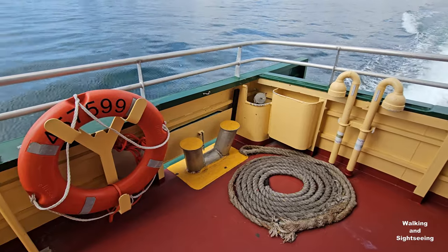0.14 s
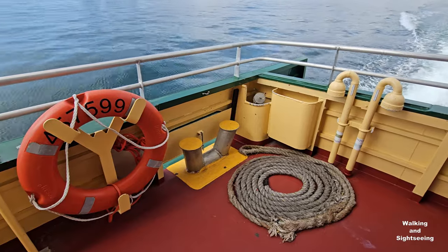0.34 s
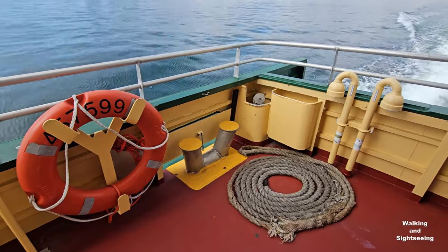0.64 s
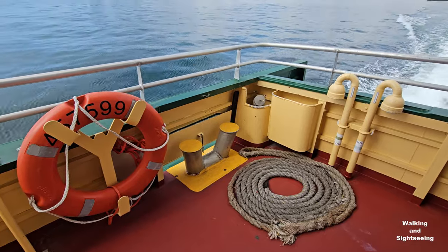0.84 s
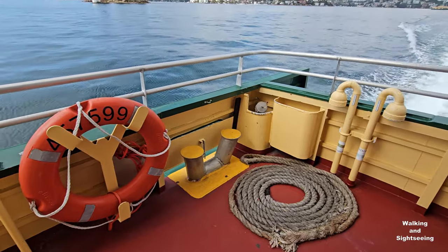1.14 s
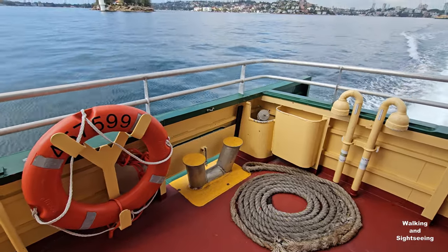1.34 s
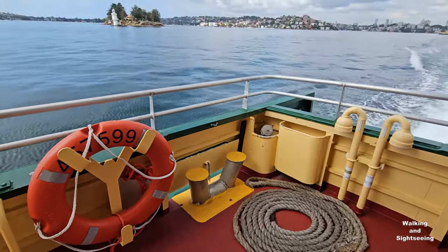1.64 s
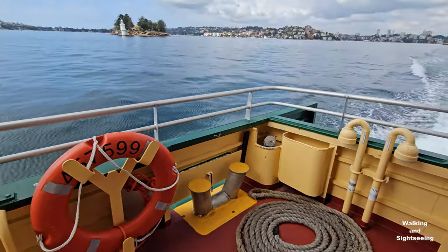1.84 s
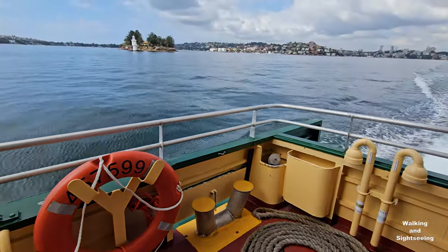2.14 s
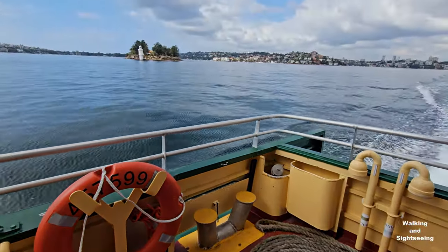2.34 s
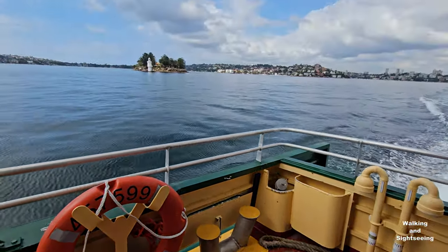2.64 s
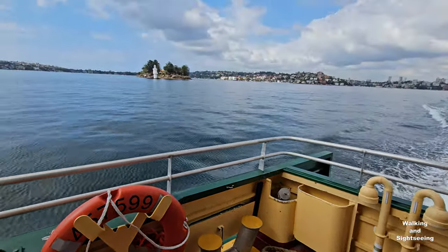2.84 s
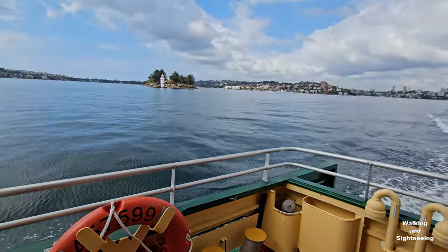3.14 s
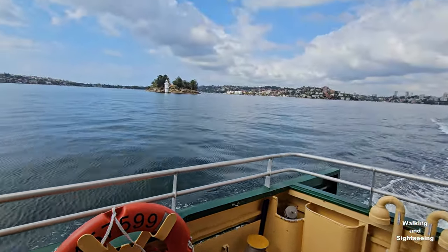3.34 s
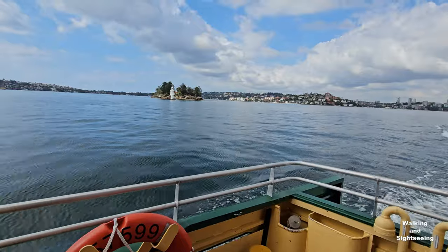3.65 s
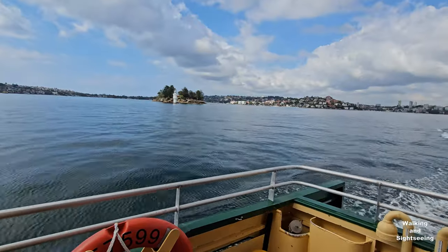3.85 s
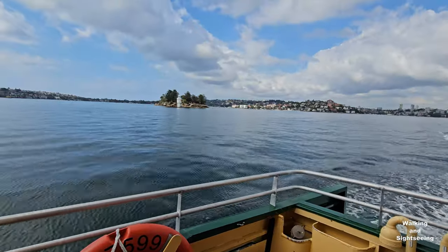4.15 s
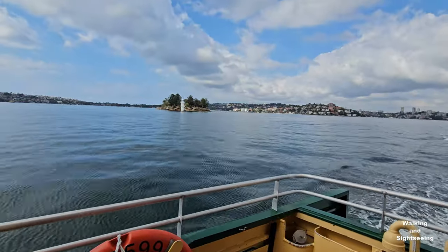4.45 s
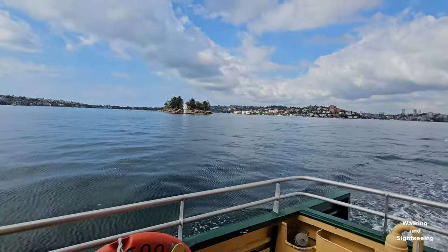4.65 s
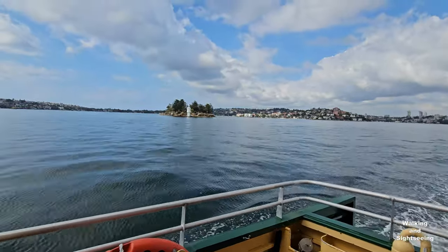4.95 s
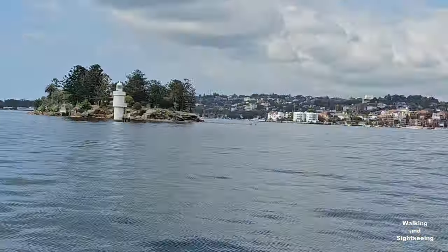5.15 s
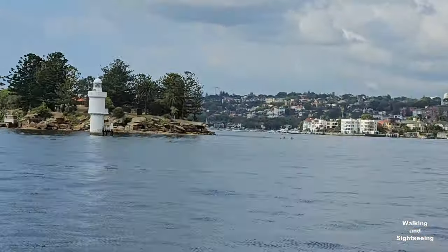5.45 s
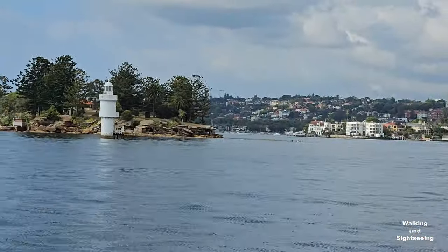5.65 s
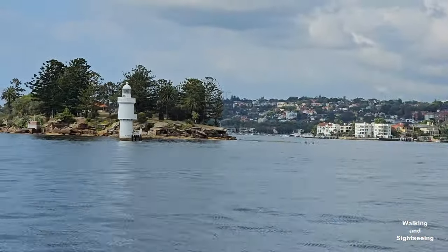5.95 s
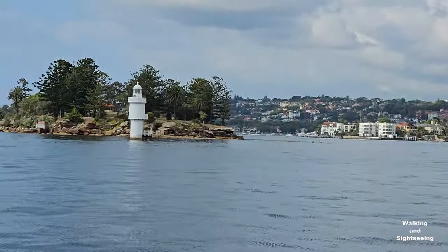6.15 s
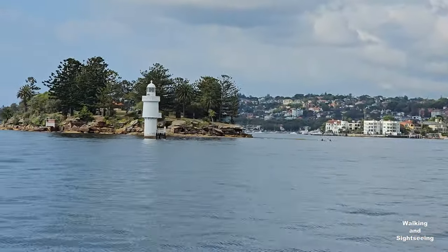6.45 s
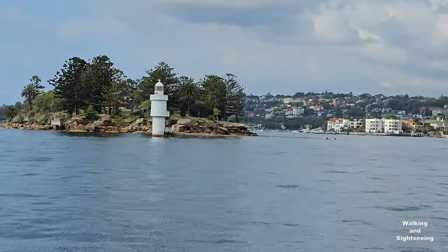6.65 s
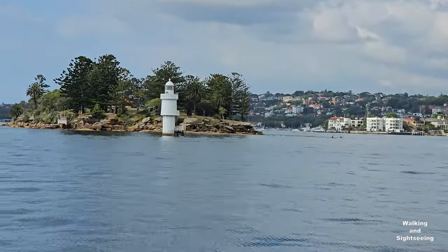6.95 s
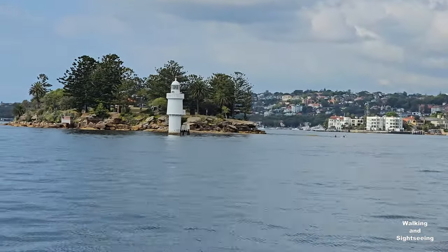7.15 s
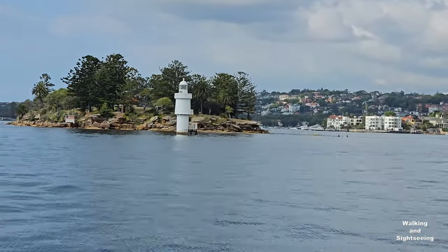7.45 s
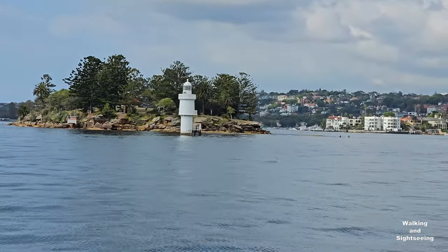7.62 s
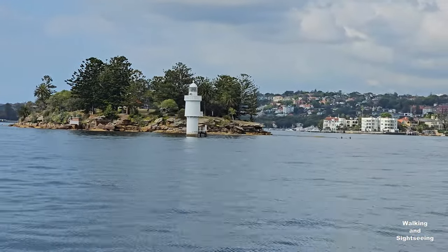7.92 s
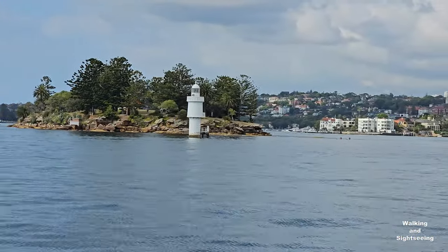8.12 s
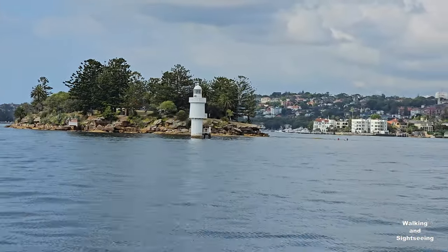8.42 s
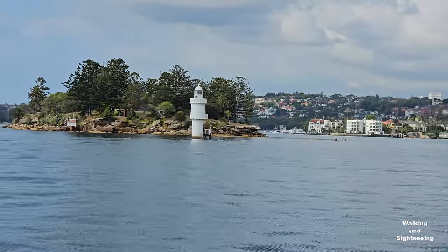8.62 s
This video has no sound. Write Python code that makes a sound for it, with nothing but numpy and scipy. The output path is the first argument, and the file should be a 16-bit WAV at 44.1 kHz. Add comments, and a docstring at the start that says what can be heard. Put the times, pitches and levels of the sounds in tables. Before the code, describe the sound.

A steady heavy engine rumble fills the whole stretch, slightly beating and pulsing, with a mid-pitched exhaust roar and the soft wash of the wake. A thin whistle wavers very high and quick ticks come faintly from the right. Outdoors on deck, gusts knock the left microphone port. Past the midpoint the sound turns darker and bassier, then slowly fills out.

```python
"""A ferry's stern deck under way: two engines, the main diesel and a generator set, drone as steady tones
over a hull rumble of noise. Filtered noise makes the exhaust roar and the wake's hiss, a wavering sine the
turbocharger whistle, and sharp taps ring a cover as valve ticks. Wind buffets both microphone ports
and pops on the left one. Part-way the pickup narrows, which lifts the rumble and dips the hiss."""
import sys
import numpy as np
from scipy import signal
from scipy.fft import rfft, irfft, next_fast_len
from scipy.io import wavfile
from scipy.ndimage import uniform_filter1d, map_coordinates

SR = 44100
rng = np.random.default_rng(int(sys.argv[2]) if len(sys.argv) > 2 else 0)


def wrap_up_sound(samples):
    """Save the sound to the file named by the first command line argument, as 16-bit audio."""
    columns = np.atleast_2d(samples).T
    # keep every value between -1 and 1, then stretch to whole-number steps
    tamed = np.clip(columns, -1, 1)
    steps = np.round(tamed * 32767).astype(np.int16)
    wavfile.write(sys.argv[1], SR, steps)


N = 387198
TIME_S = np.arange(N) / SR


def amp(db):
    """Turn decibels into a gain."""
    return 10 ** (np.asarray(db) / 20)


def unit(x):
    """Scale x to an rms of 1."""
    return x / np.sqrt(np.mean(x ** 2) + 1e-20)


def along(points, hz):
    """Read a curve of (Hz, value) points at any frequency, on a log axis."""
    f, value = np.transpose(points)
    return np.interp(np.log(hz + 1), np.log(f + 1), value)


def over_time(points):
    """Join (s, value) points by straight lines, one value per sample."""
    s, value = np.transpose(points)
    return np.interp(TIME_S, s, value)


def wobble(rate_hz):
    """A smooth random curve with rate_hz random points a second."""
    points = rng.standard_normal(int(N * rate_hz / SR) + 4)
    return map_coordinates(points, [np.arange(N) * rate_hz / SR])


def bump(at_s, half_length_s):
    """A smooth rise and fall of height 1."""
    return np.exp(-((TIME_S - at_s) / half_length_s) ** 2)


def filtered(x, response):
    """Shape x by a response that depends on frequency."""
    m = next_fast_len(N + SR // 2)  # room for the ringing
    hz = np.fft.rfftfreq(m, 1 / SR)
    return irfft(rfft(x, m) * response(hz), m)[..., :N]


def resonances(modes):
    """Response of several ringing modes (Hz, width Hz, dB), with alternating signs."""
    def response(hz):
        total = 0
        for k, (centre, width, db) in enumerate(modes):
            damping = 1j * hz * width
            total = total + (-1) ** k * amp(db) * damping / (centre ** 2 - hz ** 2 + damping)
        return total
    return response


def cycles(rate):
    """Engine cycles done at each sample: the running sum of the rate."""
    return np.cumsum(over_time(rate)) / SR


SWITCH_S, SWITCH_TAKES_S, SETTLE_S = 4.855, 0.32, 0.98


def narrowed():
    """Share of the narrow pickup, sliding from 0 to 1."""
    return np.clip((TIME_S - SWITCH_S) / SWITCH_TAKES_S, 0, 1)


def level_db(wide_db, step_db, regained_db):
    """A steady level, a step as the pickup narrows, then a slow climb."""
    since = np.clip(TIME_S - SWITCH_S - SWITCH_TAKES_S, 0, None)
    return wide_db + step_db * narrowed() + regained_db * (1 - np.exp(-since / SETTLE_S))


# how alike noise is at the two ports, 1 = the same: [f/Hz, likeness]
LIKENESS = [(60, .96), (110, .975), (200, .93), (370, .78), (680, .4), (1240, -.2), (2280, -.04), (4180, 0)]


def rush(spectrum, patchy_db):
    """Coloured stereo noise of rms 1, with random patches in time and pitch; its bass is alike at both ports."""
    z = signal.stft(rng.standard_normal((2, N)), nperseg=512)[2]
    patches = uniform_filter1d(rng.standard_normal(z.shape[1:]), size=8, axis=0)
    patches = uniform_filter1d(patches, size=10, axis=1)
    pair = signal.istft(z * amp(patchy_db * unit(patches)), nperseg=512)[1][:, :N]

    def mid_side(hz):
        angle = np.arccos(np.clip(along(LIKENESS, hz), -1, 1)) / 2
        return amp(along(spectrum, hz)) * [np.cos(angle), np.sin(angle)]

    mid, side = filtered(pair, mid_side)
    return unit(np.array([mid + side, mid - side]))


# colour of the wake's hiss before its overall level: [f/Hz, level/dB]
WAKE_COLOUR = [(880, 0), (1500, -3), (2190, -1), (2730, -6), (4900, -6.5), (5450, -5.5), (6900, -8),
               (7500, -4.5), (8500, -6.5), (9300, -0.5), (9850, -3.5), (10500, -15), (11500, -8.5),
               (12300, -12.5), (14600, -13)]


def wake(generator_turns):
    """Churning water as noise that throbs once per generator cycle and splashes irregularly."""
    throb_db = 0.8 * np.cos(2 * np.pi * (generator_turns - .5))
    splash_db = .5 * wobble(9.4) + 0.1 * wobble(4.23)
    level = level_db(wide_db=-37.5, step_db=-5, regained_db=5.8)
    return amp(level + throb_db + splash_db) * rush(WAKE_COLOUR, patchy_db=0.83)


# colour of the exhaust roar before its overall level: [f/Hz, level/dB]
ROAR_COLOUR = [(200, -45), (330, -4), (420, -0.5), (560, -5), (650, -10.5), (850, -9.5), (1000, -17.5),
               (1300, -15), (1700, -25.5), (3000, -42.5)]


def exhaust_roar():
    """Exhaust noise, strongest in the middle pitches, with a slightly unsteady level."""
    level = level_db(wide_db=-36, step_db=1.1, regained_db=4.2)
    return amp(level + .6 * wobble(9)) * rush(ROAR_COLOUR, patchy_db=1)


# colour that the narrow pickup gives the roar and hiss: [f/Hz, level/dB]
NARROW_COLOUR = [(300, -3.5), (430, 3), (560, 0), (700, -2), (1100, -2.5), (1500, 0), (2500, 0),
                 (5000, -0.5), (8000, -1.5), (9500, -2.5), (11000, -5), (14000, -9)]


def through_pickup(wide):
    """Fade from the wide sound to the narrow pickup's duller colour."""
    share = narrowed()
    narrow = filtered(wide, lambda hz: amp(along(NARROW_COLOUR, hz)))
    return (1 - share) * wide + share * narrow


def pop(db, t60_s, edge_hz):
    """An eddy bursts on the port: a sudden low push and a brief edge tone at its rim, duller in the treble."""
    t = np.arange(SR // 5) / SR
    hz = np.fft.rfftfreq(len(t), 1 / SR)
    snap = np.exp(-((t - .002) / .0002) ** 2)
    fade = amp(-60 * t / t60_s) * (1 - np.exp(-t / .001))
    burst = snap + fade * rng.standard_normal(len(t))
    ring = resonances([(150, 300, -2), (edge_hz, 250, 0), (1500, 1500, -24)])
    z = rfft(burst) * ring(hz) / (1 + 1j * hz / 3000) ** 2
    onset = irfft(z * (hz > 400), len(t))[:SR // 60]  # the level is set on this part
    return amp(db) * irfft(z, len(t)) / np.sqrt(np.mean(onset ** 2))


# colour of the low wind buffeting before its overall level: [f/Hz, level/dB]
BUFFET_COLOUR = [(25, -16), (50, 5.5), (250, -4.5), (500, -12), (800, -17), (1200, -38.5), (2500, -37),
                 (5000, -76)]
# wind gusts, before each port's own gain: [t/s, half length/s, level/dB]
WIND_GUSTS = [(0, .5, -27), (2.75, .2, -28.5), (3.7, .25, -31), (5.096, .3, -31), (6.003, .5, -28),
              (7.303, .6, -28), (8.752, .25, -27)]
# loudest pops on the left port; level is that of the onset above 400 Hz,
# t60 the time its noise tail takes to fall 60 dB: [t/s, level/dB, t60/s, edge tone f/Hz]
LOUD_POPS = [(2.714, -18, .025, 450), (2.762, -24, .04, 550), (2.781, -28, .03, 800),
             (3.667, -23, .08, 550), (3.69, -25, .06, 500), (3.715, -27, .06, 500), (5.19, -26, .06, 500),
             (5.225, -26, .06, 650), (6.214, -19, .05, 720), (6.231, -22, .035, 720),
             (6.243, -25, .03, 700), (7.422, -23, .06, 500), (7.455, -23, .05, 450), (7.645, -24, .05, 450),
             (7.739, -22, .07, 650), (7.789, -24, .06, 500), (8.639, -24, .1, 400), (8.718, -23, .06, 500)]


def wind():
    """Turbulence on the ports: unrelated low buffeting on both, and short pops on the windward left."""
    calm_db = -40  # buffeting between gusts
    strength = amp(calm_db) + sum(amp(db) * bump(s, half_s) for s, half_s, db in WIND_GUSTS)
    noise = filtered(rng.standard_normal((2, N)), lambda hz: amp(along(BUFFET_COLOUR, hz)))
    lumps = amp(5.8 * np.array([wobble(14), wobble(14)]))
    port_gain = amp([[1.5], [-3]])  # left, right
    buffeting = strength * port_gain * unit(lumps * noise)
    out = np.pad(buffeting, ((0, 0), (0, SR)))

    # ten small pops, likelier where the wind is stronger
    when, size, pitch = rng.random((10, 3)).T
    starts = np.interp(when, np.cumsum(strength) / strength.sum(), TIME_S)
    small_db, small_t60_s, small_hz = -30, .07, 450
    small_pops = [(s, small_db + 5 * (a - .5), small_t60_s, small_hz * (.8 + .4 * p))
                  for s, a, p in zip(starts, size, pitch)]
    for s, *shape in LOUD_POPS + small_pops:
        out[0, round(s * SR):][:SR // 5] += pop(*shape)
    return out[:, :N]


# pitch of the turbocharger whistle before its flutter: [t/s, f/Hz]
WHISTLE_PITCH = [(0, 9500), (1.9, 9488), (3.1, 9460), (4.65, 9510), (6.2, 9462), (7.8, 9527), (8.78, 9490)]


def turbocharger():
    """A thin unsteady whistle; the main engine's firing puts a weaker side tone below it."""
    hz = over_time(WHISTLE_PITCH) + 8 * wobble(30)
    port_drift = 1.2 * np.array([wobble(14), wobble(14)])
    phase = 2 * np.pi * np.cumsum(hz) / SR + port_drift
    side_tone = amp(-7) * np.sin(phase - 2 * np.pi * cycles(MAIN_SPEED) * 3)  # three firings a cycle lower
    flicker = amp(2.1 * np.array([wobble(11), wobble(12)]))
    level = level_db(wide_db=-48.5, step_db=-4, regained_db=1)
    return amp(level) * unit(flicker * (np.sin(phase) + side_tone))


# four valve closings: [share of the generator cycle, level/dB]
VALVE_TAPS = [(.11, -9), (.305, 0), (.51, -1), (.925, -8)]
# ringing of the valve cover: [f/Hz, width/Hz, level/dB]
COVER_MODES = [(5450, 300, -14), (7450, 250, -11), (7890, 60, 0), (7980, 60, -3), (8050, 80, -2)]


def valve_gear(turns):
    """Four closings per cycle, uneven in strength, each a sharp tap ringing the cover; louder on the right."""
    draw = rng.standard_normal((int(turns[-1]) + 2, len(VALVE_TAPS), 3))
    # one strength for both ports, a random sign for each
    strength = amp(2.5 * draw[..., :1]) * np.sign(draw[..., 1:])
    taps = np.zeros((2, N))
    for i, (share, db) in enumerate(VALVE_TAPS):
        count = np.floor(turns - share).astype(int)
        closes = np.diff(count, prepend=count[0])  # 1 at each closing, otherwise 0
        taps += amp(db) * strength[count, i].T * closes
    level = level_db(wide_db=-52, step_db=-8, regained_db=3.5)
    louder_db = 4 * bump(at_s=1, half_length_s=.6)  # stronger ticking for a while
    port_db = [[-5], [2]]  # left, right
    return amp(level + louder_db + port_db) * unit(filtered(taps, resonances(COVER_MODES)))


# colour of the hull's noise before its overall level: [f/Hz, level/dB]
HULL_COLOUR = [(20, -26), (35, -23), (55, -2.5), (80, -3.5), (95, -5.5), (112, -12), (140, -6),
               (175, -10.5), (200, -1), (220, -4), (255, -7), (285, -14.5), (350, -22), (600, -54.5)]
# brief dips and surges of the whole rumble, tones included: [t/s, half length/s, level/dB]
RUMBLE_SURGES = [(5.393, 0.042, -4), (5.554, 0.082, 4), (8.003, .06, 2)]


def hull_rumble(tones):
    """The steel hull carries the engine tones together with low noise."""
    level = level_db(wide_db=-16.5, step_db=2.18, regained_db=2.13)
    surge_db = sum(db * bump(s, half_s) for s, half_s, db in RUMBLE_SURGES)
    sag_db = -7 * bump(at_s=5.5, half_length_s=0.11)  # the tones sag just after the switch
    noise = amp(-3.0) * rush(HULL_COLOUR, patchy_db=1)
    return amp(level + surge_db) * (amp(sag_db) * tones + noise)


def engine(turns, orders, smear):
    """Firing orders as swaying tones; the pipe smears the pulse, shifting orders away from the sixth."""
    tones = 0
    for k, db in orders:
        phase = 2 * np.pi * (k * turns + smear * (k - 6) ** 2)
        tones = tones + np.sqrt(2) * amp(db + .7 * wobble(1.35)) * np.cos(phase)
    return tones


# generator speed in engine cycles per second: [t/s, f/Hz]
GENERATOR_SPEED = [(0, 12.481), (3.8, 12.481), (4.4, 12.506), (8, 12.506), (8.78, 12.49)]
# generator tones, before the rumble level: [multiple of the cycle rate, level/dB]
GENERATOR_TONES = [(3, -26), (4, -14.5), (5, -22), (6, -9.5), (7, -8), (8, -29), (10, -22.5), (11, -21),
                   (12, -33.5), (15, -26.5), (16, -21), (17, -18), (18, -24.5), (20, -27), (76, -52)]


def generator_set(turns):
    """The generator's uneven firing as multiples of its cycle rate."""
    return -engine(turns - .42, GENERATOR_TONES, smear=-.09)


# main engine speed in engine cycles per second: [t/s, f/Hz]
MAIN_SPEED = [(0, 15.305), (4, 15.305), (4.6, 15.322), (8.78, 15.322)]
# main engine tones, before their swell and the rumble level: [multiple of the cycle rate, level/dB]
MAIN_TONES = [(2, -39), (3, -20), (5, -17.5), (6, -8), (13, -27), (14, -22), (17, -25), (20, -34),
              (24, -37.5), (32, -43), (56, -53)]
# slow swell of the main engine tones, before the rumble level: [t/s, level/dB]
MAIN_SWELL = [(0, -11), (1, -2), (2.4, 2), (5, 1.5), (5.8, -2.5), (8.78, -4.5)]


def main_diesel():
    """The main engine's firing as multiples of its cycle rate, swelling and easing slowly."""
    return amp(over_time(MAIN_SWELL)) * engine(cycles(MAIN_SPEED), MAIN_TONES, smear=.03)


# lean of the deck sounds between the ports: [f/Hz, left minus right level/dB]
PORT_LEAN = [(60, 1), (91, 0.5), (140, -1), (210, 1), (320, 1.5), (490, 0.5), (740, 1), (1130, -1),
             (1720, -1.0), (2620, -2.5), (3990, 0), (6070, -2.5), (9230, 2), (14000, -2.5)]


def at_ports(deck):
    """The engines sit nearer the right port, so the left hears the deck slightly later."""
    left_right = np.array([[1], [-1]])
    left_lag_s = .00015  # shared out as half a delay and half an advance

    def response(hz):
        gain = amp(along(PORT_LEAN, hz) / 2 * left_right)
        return gain * np.exp(-1j * np.pi * hz * left_lag_s * left_right)

    return filtered(deck, response)


def scene():
    """Wake, exhaust, hull and engines lean across the ports; wind acts on the ports directly."""
    generator_turns = cycles(GENERATOR_SPEED)
    wash = through_pickup(exhaust_roar() + wake(generator_turns))
    tones = generator_set(generator_turns) + main_diesel()
    deck = wash + turbocharger() + valve_gear(generator_turns) + hull_rumble(tones)
    return at_ports(deck) + wind()


def record(dry):
    """Gain control eases off on each throb, peaks are rounded, nothing is kept above the band limit."""
    power = np.abs(uniform_filter1d(np.mean(dry ** 2, axis=0), size=SR // 25)) + 1e-6
    usual_power = uniform_filter1d(power, size=SR // 2)  # half-second average
    held = dry * (power / usual_power) ** -.08
    rounded = held / (1 + np.abs(held) ** 8) ** (1 / 8)
    return filtered(rounded, lambda hz: hz < 14480)


dry = scene()
out = record(dry)
wrap_up_sound(out)
```